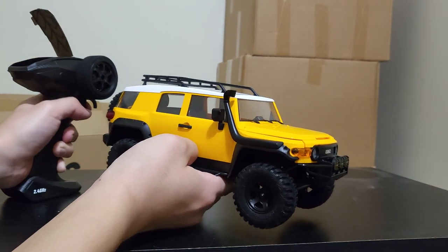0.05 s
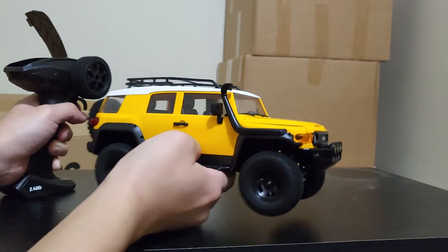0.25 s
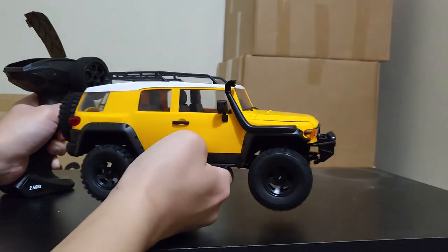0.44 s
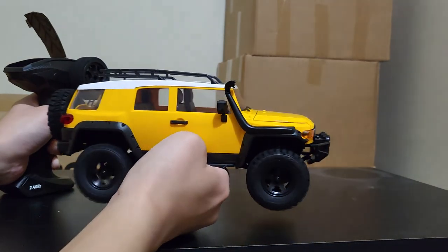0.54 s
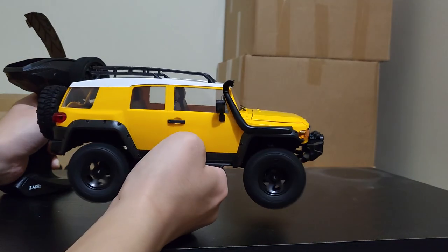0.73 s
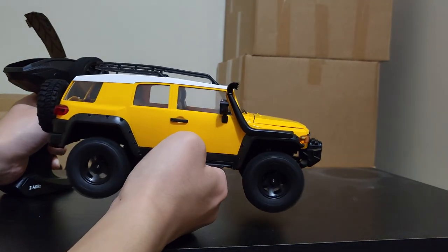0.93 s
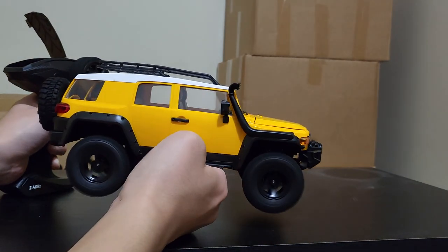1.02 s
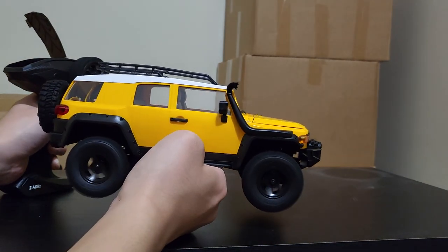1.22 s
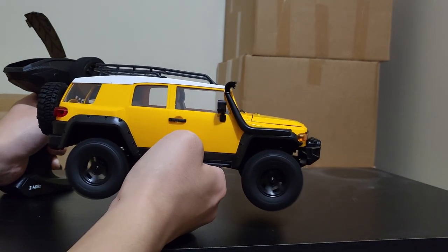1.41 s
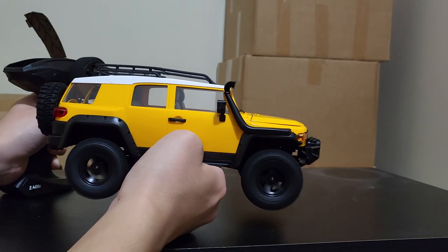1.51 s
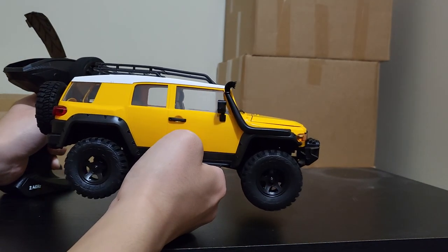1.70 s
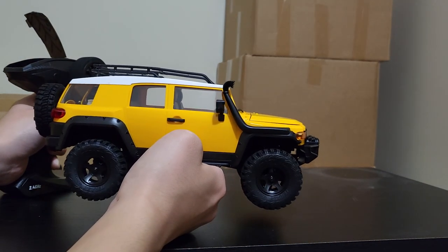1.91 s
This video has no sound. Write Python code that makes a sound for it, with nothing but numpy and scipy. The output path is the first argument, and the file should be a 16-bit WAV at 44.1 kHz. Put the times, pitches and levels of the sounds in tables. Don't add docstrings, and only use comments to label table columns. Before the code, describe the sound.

Small motor and plastic gears of a hand-held toy truck whirr faster in steps, then coast down

```python
import sys
import numpy as np
from scipy import signal
from scipy.fft import rfft, irfft, next_fast_len
from scipy.io import wavfile
from scipy.ndimage import uniform_filter1d

SR = 44100
rng = np.random.default_rng(int(sys.argv[2]) if len(sys.argv) > 2 else 0)


def decibels_to_gain(level_db):
    exponent = np.asarray(level_db, float) / 20
    return 10 ** exponent


def generate_wav(sig):
    pcm = np.round(np.clip(np.atleast_2d(sig).T, -1, 1) * 32767).astype(np.int16)
    wavfile.write(sys.argv[1], SR, pcm)


N = 85995

# (frequency [Hz], density [dB per Hz])
AIR_SPECTRUM = [(25, -37), (60, -9), (130, -14.5), (300, -16), (800, -48.5), (1300, -32.5), (2600, -30.5),
                (15800, -37)]
AIR_DB = -66.5
HUM_HZ, HUM_DB, HUM_WAVER_DB = 121.8, -66, 5

ROOM_T60_S, ROOM_DB, WALL_LOSS_HZ = 0.3, -17, 9000

# (frequency [Hz], likeness [0..1])
LIKENESS = [(40, 0.66), (700, 0.87), (1100, 0.035), (15000, .05)]
# (frequency [Hz], left minus right [dB])
LEAN = [(60, -5.5), (130, -2), (370, 4.5), (750, -1.5), (1410, 1), (3100, 2), (6000, 5), (15000, -5)]
SPREAD_S = 0.000082

# (frequency [Hz], width [Hz], level [dB])
SHELL_MODES = [(292.2, 36, -2.5), (437, 20, 4.5), (535, 31, 3.5), (670, 25, -1), (696, 27, -1),
               (775, 20, 2.5)]
# (frequency [Hz], width [Hz], level [dB])
GRIP_MODES = [(283, 16, 4), (444, 8.3, -9), (820, 100, -7.5)]
# (time [s], level [dB])
GRIPS = [
    (.01, -66),
    (.092, -54.5),
    (.15, -62),
    (.26, -52.5),
    (.31, -55.5),
]
GRIP_DECAY_S = 0.048

# (time [s], gear hiss [dB], shell shaking [dB])
LOAD = [(.17, -109, -65.5), (0.192, -58.5, -57), (0.217, -44.5, -54.5), (.26, -39.5, -44.5),
        (.34, -42.5, -53.5), (.4, -45, -51.5), (0.501, -53, -54), (0.557, -47.5, -52), (.575, -37, -50.5),
        (.61, -37, -45.5), (.65, -41, -53.5), (.95, -41, -56), (1.03, -35.5, -50), (1.09, -41.5, -53.5),
        (1.601, -38.5, -51.5), (1.65, -38, -41), (1.711, -54, -56.5), (1.8, -70.5, -70)]
# (frequency [Hz], density [dB per Hz])
GEAR_SPECTRUM = [(500, -41), (850, -16), (2000, -6), (2900, -11), (4000, -8), (6800, -5.5), (8300, -7),
                 (15800, -20.5)]
# (frequency [Hz], width [Hz], level [dB])
GEAR_MODES = [(2074, 43, 2.5), (1850, 66, -21), (5335, 100, 4.5), (6390, 170, 9), (6930, 150, 9),
              (7400, 80, 9.5), (8720, 40, -7), (9630, 200, 4.5)]
GEAR_MODES_DB, SLOW_DULL_DB = -3, 3
PULSE_ONCE, PULSE_TWICE = 0.08, 0.18

# (time [s], shaft speed [Hz], magnetic pull [dB])
DRIVE = [(0.19, 109.4, -5), (0.25, 161.3, -5), (0.298, 192.9, -6.5), (0.334, 197.8, 2), (0.39, 180.9, -4.5),
         (0.552, 181.5, -8.5), (0.64, 262.2, 2), (0.696, 271.5, 0.5), (0.77, 268.1, 5), (0.836, 242.4, 0.5),
         (0.954, 244.3, 0.5), (1.034, 354.8, 3), (1.06, 379.6, 1.5), (1.584, 378.9, 1.5),
         (1.606, 358.4, 2.5), (1.706, 214.8, 0.5), (1.76, 144.4, -15)]
# (multiple of shaft speed, rms at full speed [dB], slope [dB per octave of speed], unsteadiness [dB])
SHAFT_ORDERS = [(1, -40, 18.5, 1.53), (2, -37.5, 8, 0.04), (3, -65.5, -14.5, 1.5), (4, -59, -5.5, 3),
                (5, -63, -3.5, 3.5), (6, -58.5, 34, -3.5), (7, -62.5, -7, 4.5), (8, -65, -13.5, 5.5),
                (9, -66, -2, -10.5), (10, -51, -4.5, 3), (12, -68, 1, 6.5), (13, -58.5, 6, 5),
                (14, -61, 11, 5), (17, -64, 30, 8), (20, -50.5, 9.5, 2), (24, -50, 32, 3),
                (33, -85, 45, 16), (34, -75.5, 45, -10.5), (35, -79, 50, -6), (36, -69, 49, -3),
                (37, -77, 47, 0.5), (38, -66, 51, 10), (39, -62, 50, 0), (40, -56.5, 52, -2),
                (41, -54.5, 41, 2)]
# (multiple of shaft speed, rms at full speed [dB])
MESH_SIDEBANDS = [(10.48, -61), (14.32, -62), (14.53, -63), (15.66, -63), (24.3, -62)]
FULL_HZ, LOW_HZ, STALL_DB = 378, 240, 10
LOCK_HZ, LOCK_WIDTH_HZ, LOCK_DB = 330.7, 9.2, 8
SLOW_FLICKER_DB, SURGE_DB, TONE_RING_DB, JITTER_TURNS = 2.5, 1.5, 3, 0.004
POWER_OFF_S, COAST_DB_PER_S = 1.6, 500
RESTART_S, RESTART_HZ, RESTART_DB, RESTART_DB_PER_S = 1.91, 243, -77.5, 597.5

FADE_S, FADE_DB_PER_S, FADE_BACK_S, BACK_DB_PER_S = 1.733, 80.5, 1.902, 129


def rms_one(x):
    return x / np.sqrt(np.mean(x ** 2) + 1e-20)


def at_hz(points, hz):
    table = np.array(points)
    return np.interp(np.log(hz), np.log(table[:, 0]), table[:, 1])


def drift(rate):
    hop = 40
    r = np.exp(-2 * np.pi * hop * rate / SR)
    white = rng.standard_normal(N // hop + 2002)
    slow = signal.lfilter([1], [1, -2 * r, r * r], white)[2000:]
    return np.interp(np.arange(N) / hop, np.arange(len(slow)), rms_one(slow))


def resonate(x, hz, width_hz):
    r = np.exp(-np.pi * width_hz / SR)
    poles = [1, -2 * r * np.cos(2 * np.pi * hz / SR), r * r]
    return signal.lfilter([(1 - r * r) / 2, 0, (r * r - 1) / 2], poles, x)


def stereo(white, hz):
    alike = np.clip(at_hz(LIKENESS, hz), -1, 1)
    side = np.array([[1], [-1]])
    common = np.sqrt(1 + alike) * white[0]
    opposed = np.sqrt(1 - alike) * white[1] * side
    return decibels_to_gain(side * at_hz(LEAN, hz) / 2) * (common + opposed)


def banded(spectrum, patchy_db, tilt_db=0):
    out = 0
    white = rng.standard_normal((2, 2, N))
    edges = 25 * 2 ** np.arange(0, 9.6, 0.5)
    for k, (low, high) in enumerate(zip(edges, edges[1:])):
        hz = np.sqrt(low * high)
        sos = signal.butter(2, [low, high], "band", fs=SR, output="sos")
        band = signal.sosfilt(sos, white[k % 2])
        level_db = at_hz(spectrum, hz) + patchy_db * drift(13) + tilt_db * np.log2(hz / 5000)
        out = out + decibels_to_gain(level_db) * stereo(band, hz)
    return rms_one(out)


def rings(modes, patchy_db):
    white = rng.standard_normal((2, N))
    out = 0
    for k, (hz, width_hz, db) in enumerate(modes):
        level = decibels_to_gain(db + patchy_db * drift(23.8)) / np.sqrt(width_hz)
        out = out + (-1) ** k * level * stereo(resonate(white, hz, width_hz), hz)
    return rms_one(out)


def roomtone():
    t = np.arange(N) / SR
    hum_level = decibels_to_gain(HUM_DB + HUM_WAVER_DB * drift(1.7))
    hum = hum_level * np.sin(2 * np.pi * (HUM_HZ * t + 0.076 * drift(7.9)))
    return decibels_to_gain(AIR_DB) * banded(AIR_SPECTRUM, patchy_db=0.5) + np.sqrt(2) * hum


def room(x):
    size = next_fast_len(N + SR)
    w = 2 * np.pi * np.arange(size // 2 + 1) / size
    hz = w * SR / 2 / np.pi
    lags = (rng.uniform(0.015, 0.04, (2, 8, 1)) * SR).round()
    loss_db = -60 * lags / SR / ROOM_T60_S * (1 + (hz / WALL_LOSS_HZ) ** 2)
    loop = decibels_to_gain(loss_db) * np.exp(-1j * w * lags)
    echoes = (loop / (1 - loop)).sum(axis=1)
    return irfft(rfft(x, size) * echoes, size)[:, :N]


def shell(shake_db):
    t = np.arange(N) / SR
    grip = 0
    for s, db in GRIPS:
        steepness = np.where(t > s, 1, 6.0)
        grip = grip + decibels_to_gain(db) * np.exp(-steepness * np.abs(t - s) / GRIP_DECAY_S)
    shaken = decibels_to_gain(shake_db) * rings(SHELL_MODES, patchy_db=2.0)
    return shaken + grip * rings(GRIP_MODES, patchy_db=0.5)


def gears(hz, turns, hiss_db):
    pulse = 1 + PULSE_ONCE * np.cos(2 * np.pi * turns) + PULSE_TWICE * np.cos(4 * np.pi * turns)
    hiss = banded(GEAR_SPECTRUM, patchy_db=0.5, tilt_db=SLOW_DULL_DB * np.log2(hz / FULL_HZ))
    body = hiss + decibels_to_gain(GEAR_MODES_DB) * rings(GEAR_MODES, patchy_db=2.5)
    return decibels_to_gain(hiss_db + 1.0 * drift(25)) * pulse * body


def controls():
    t = np.arange(N) / SR
    drive_s, speed, pull = np.transpose(DRIVE)
    load_s, hiss, shake = np.transpose(LOAD)
    hz = np.interp(t, drive_s, speed)
    outside_s = np.maximum(drive_s[0] - t, t - drive_s[-1])
    pull_db = np.interp(t, drive_s, pull) - 800 * np.clip(outside_s, 0, 1)
    hiss_db = np.interp(t, load_s, hiss) - 500 * np.clip(load_s[0] - t, 0, 1)
    shake_db = np.interp(t, load_s, shake)
    late = t > RESTART_S
    again_db = RESTART_DB + RESTART_DB_PER_S * (t - RESTART_S)
    return (np.where(late, RESTART_HZ, hz), np.where(late, again_db, hiss_db),
            np.where(late, again_db + 40, pull_db), np.where(late, again_db + 2, shake_db))


def whine(hz, turns, pull_db):
    out, side, t = 0, np.array([[0.5], [-0.5]]), np.arange(N) / SR
    coast_db = COAST_DB_PER_S * np.clip(t - POWER_OFF_S, 0, 1) * (t < RESTART_S)
    octaves = np.log2(np.maximum(hz, LOW_HZ) / FULL_HZ)
    stall_db = STALL_DB * np.log2(np.minimum(hz, LOW_HZ) / LOW_HZ)
    octaves_per_s = np.abs(np.gradient(np.log2(hz))) * SR
    surge = np.minimum(uniform_filter1d(octaves_per_s, size=800), 6.0)
    lock_db = LOCK_DB * (np.tanh((hz - LOCK_HZ) / LOCK_WIDTH_HZ) - 1) / 2
    orders = [(round(k), *rest) for k, *rest in SHAFT_ORDERS]
    orders += [(k, db, 16, 3) for k, db in MESH_SIDEBANDS]
    for k, db, slope_db, flicker_db in orders:
        if k > 2:
            speed_db = -SURGE_DB * surge * (0.1 if k in (10, 20) else 1) - coast_db
        else:
            speed_db = lock_db - 0.3 * coast_db
        speed_db = speed_db + stall_db + slope_db * octaves
        shaky_db = flicker_db - SLOW_FLICKER_DB * octaves + 0.63 * surge
        flicker = shaky_db * np.minimum(drift(22), 1)
        level = decibels_to_gain(db + pull_db + speed_db + flicker + side * at_hz(LEAN, k * hz))
        jitter = JITTER_TURNS * k * (1 + surge) * drift(30)
        start = rng.random() * (k > 2)
        spread = side * np.minimum(k * hz * SPREAD_S, 0.25)
        phase = 2 * np.pi * (k * turns + start + jitter + spread)
        out = out + np.sqrt(2) * level * np.sin(phase)
    ringing = sum(resonate(out, ring_hz, 3 * width_hz) for ring_hz, width_hz, _ in GEAR_MODES[2:5])
    return out + decibels_to_gain(TONE_RING_DB) * ringing


def scene():
    hz, hiss_db, pull_db, shake_db = controls()
    turns = np.cumsum(hz * (1 + 0.00078 * drift(60))) / SR
    truck = whine(hz, turns, pull_db) + gears(hz, turns, hiss_db) + shell(shake_db)
    return truck + decibels_to_gain(ROOM_DB) * room(truck) + roomtone()


def band_limit(x):
    return signal.sosfilt(signal.butter(12, 16080, fs=SR, output="sos"), x)


def record(dry):
    t = np.arange(N) / SR
    fall_db = FADE_DB_PER_S * np.clip(np.minimum(t, FADE_BACK_S) - FADE_S, 0, 1)
    return_db = BACK_DB_PER_S * np.clip(t - FADE_BACK_S, 0, 1)
    mix = dry * decibels_to_gain(-np.maximum(fall_db - return_db, 0))
    return band_limit(mix)


dry = scene()
out = record(dry)
generate_wav(out)
```